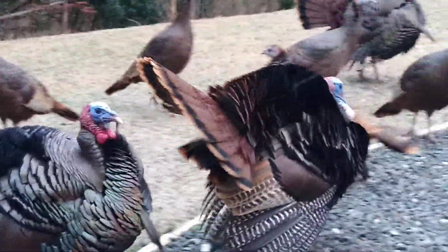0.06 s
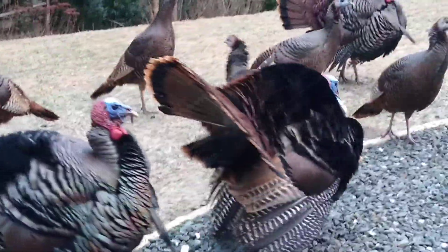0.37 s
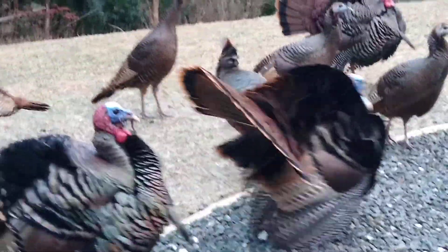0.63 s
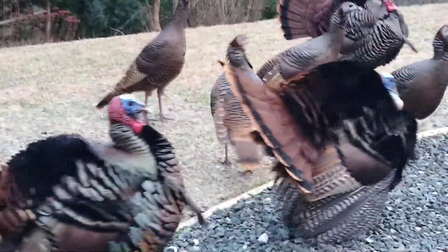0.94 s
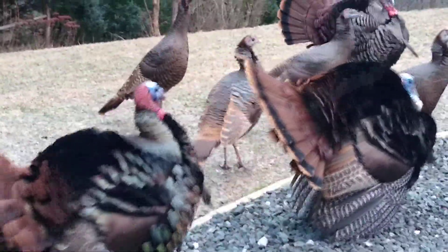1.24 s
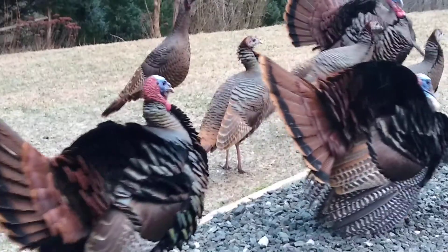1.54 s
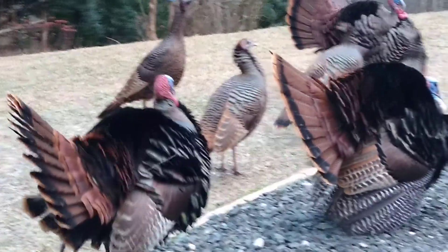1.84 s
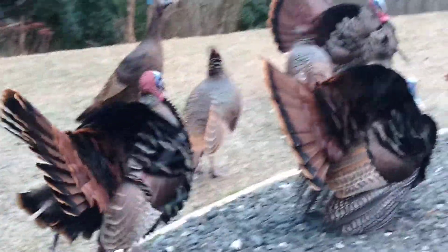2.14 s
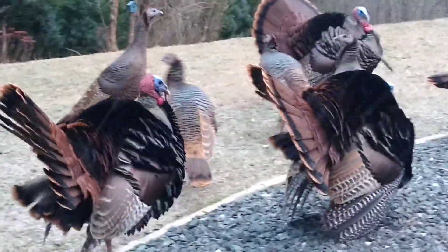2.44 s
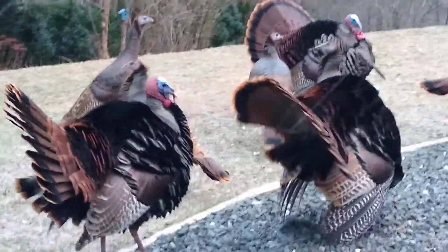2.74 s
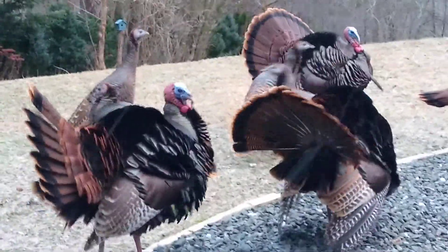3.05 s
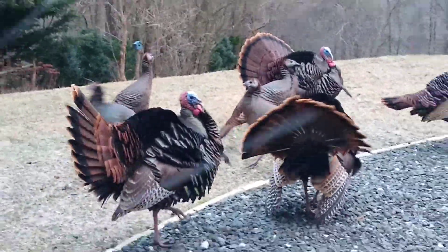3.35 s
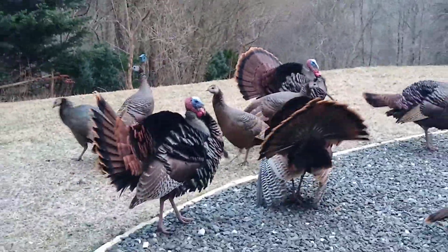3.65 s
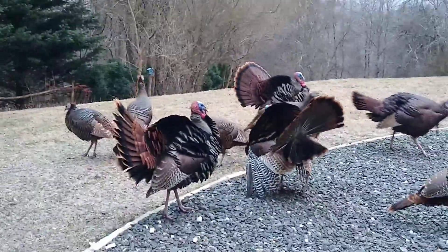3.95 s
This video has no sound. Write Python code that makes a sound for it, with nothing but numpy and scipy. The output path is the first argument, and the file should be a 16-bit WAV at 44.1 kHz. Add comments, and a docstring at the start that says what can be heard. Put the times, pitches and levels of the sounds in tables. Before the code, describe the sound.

Turkey wing feathers drag over gravel close by, rasping and ticking for the first 1.7 seconds. A short, distant gobble follows near 1.9 seconds. Brief, soft puffs sound far right at the start and at 2.1 seconds. From 2.5 seconds pebbles crunch lightly underfoot amid faint rustling, with one thin songbird whistle near 2.8. Low wind rumble builds into hard buffets on the microphone from 3.5 to 4 seconds.

```python
"""Stiff wing feathers drag, scrape and tick over stones as wild turkeys strut on a gravel drive. Pebbles crunch
under their feet and plumage rustles; two brief, breathy puffs sound close on the right. Farther off, another
bird gives a short gobble and a songbird one thin whistle, in a faint yard echo. Wind nudges the two microphone
ports and buffets them hard at the end."""
import sys
import numpy as np
from scipy import signal
from scipy.fft import rfft, irfft, next_fast_len
from scipy.io import wavfile
from scipy.ndimage import uniform_filter1d, map_coordinates

SR = 44100
rng = np.random.default_rng(int(sys.argv[2]) if len(sys.argv) > 2 else 0)


def generate_wav(signal):
    """Clip the signal to [-1, 1] and save it as 16-bit WAV at the path in sys.argv[1]."""
    frames = np.transpose(np.atleast_2d(signal))
    scaled = np.clip(frames, -1, 1) * 32767
    pcm = np.round(scaled).astype(np.int16)
    wavfile.write(sys.argv[1], SR, pcm)


N = 176400
CONTACT_LEAD_S = 0.0092  # faint grit ahead of each crack


def amp(db):
    """Decibels to gain."""
    return 10 ** (np.asarray(db) / 20)


def unit(x):
    """Scale to rms 1."""
    return x / np.sqrt(np.mean(x ** 2) + 1e-20)


def along(points, hz):
    """Read (Hz, value) points on a log frequency axis."""
    freqs, values = np.transpose(points)
    return np.interp(np.log(hz + 1), np.log(freqs + 1), values)


def curves(rows):
    """One automation curve for each column after the time."""
    times, *columns = np.transpose(rows)
    return [np.interp(np.arange(N) / SR, times, column) for column in columns]


def wobble(rate):
    """A smooth random curve, rate knots a second."""
    return map_coordinates(rng.standard_normal(int(N * rate / SR) + 4), [np.arange(N) * rate / SR])


def colour(x, db_of_hz):
    """Minimum-phase EQ: nothing rings ahead of an attack."""
    n = x.shape[-1]
    m = 2 * next_fast_len(n // 2 + 4096)
    gain = amp(db_of_hz(np.fft.rfftfreq(m, 1 / SR)))
    cepstrum = irfft(np.log(np.maximum(gain, 1e-6)))
    cepstrum[1:m // 2] *= 2
    cepstrum[m // 2 + 1:] = 0
    return irfft(rfft(x, m) * np.exp(rfft(cepstrum)), m)[..., :n]


def noise(spectrum):
    """Wide stereo coloured noise, rms 1."""
    return unit(colour(rng.standard_normal((2, N)), lambda hz: along(spectrum, hz)))


def pan(db):
    """Constant-power gains, left louder than right by db."""
    side_db = np.atleast_1d(db)
    return unit(amp(np.array([side_db, -side_db]) / 2) / np.sqrt(amp(db) + amp(-db)))


def add(out, start_s, sound):
    """Mix a short sound in at start_s."""
    part = out[:, max(0, round(start_s * SR)):][:, :sound.shape[-1]]
    part += sound[..., :part.shape[1]]


def rustle(spectrum, clump_db, patchy_db, grains_per_s=700, spread_db=5.5, decay_s=0.00041, hiss_db=-1):
    """Clumps of tiny crackles over hiss, rms 1; the resonances shift as other feathers touch."""
    sizes = amp(spread_db * np.minimum(rng.exponential(size=N), 3))
    hits = sizes * (rng.random(N) < grains_per_s / SR)
    crackle = signal.lfilter([1], [1, -np.exp(-1 / (decay_s * SR))], hits)
    grains = unit(crackle * rng.standard_normal((2, N))) + amp(hiss_db) * rng.standard_normal((2, N))
    bands = signal.stft(grains * amp(clump_db * wobble(rate=120)), nperseg=256)[2]
    patches = uniform_filter1d(rng.standard_normal(bands.shape[1:]), size=2, axis=0)
    patches = uniform_filter1d(patches, size=14, axis=1)
    patchy = signal.istft(bands * amp(patchy_db * unit(patches)), nperseg=256)[1][:, :N]
    return unit(colour(patchy, lambda hz: along(spectrum, hz)))


def contact(spectrum, tilt, t60, scrape_db, scrape_t60, lead_db=-21, rise_s=0.000097, centre_share=0.55):
    """A faint lead-in, a crack and a gritty scrape; each hit has resonances of its own."""
    t = np.arange(SR // 5) / SR - CONTACT_LEAD_S
    grit_db = np.where(t < 0, lead_db + 20 * t / CONTACT_LEAD_S, scrape_db - 60 * t / scrape_t60)
    grit = amp(grit_db) * unit(rng.standard_normal(len(t)) * rng.standard_normal((2, len(t))))
    snap = np.clip(1 + t / rise_s, 0, 1) * amp(-60 * np.maximum(t, 0) / t60)
    centre = np.sqrt(centre_share) * rng.standard_normal(len(t))
    wide = np.sqrt(1 - centre_share) * rng.standard_normal((2, len(t)))
    grid_hz = np.linspace(0, SR / 2, 48)
    bumps_db = 4 * rng.standard_normal(len(grid_hz))

    def eq(hz):
        tilt_db = tilt * np.log2(np.maximum(hz, 1000) / 4000)
        return along(spectrum, hz) + np.interp(hz, grid_hz, bumps_db) + tilt_db

    eq_rms = np.sqrt(np.mean(amp(eq(grid_hz)) ** 2))
    return colour(snap * (centre + wide) + grit, eq) / eq_rms / 2


def wing_drag():
    """Feather tips trail over the stones; in each stroke they press harder and the whole wing sounds."""
    # wing tips trailing on gravel (time [s], relative level [dB])
    trailing = [(0, -44.5), (.15, -45.5), (.24, -51.5), (.35, -45.5), (.53, -44), (.61, -48.5),
                (.76, -45.5), (.93, -46), (1.08, -52), (1.22, -51), (1.36, -56.5), (1.41, -71), (1.5, -61),
                (1.7, -102), (1.87, -74), (2.3, -100)]
    # strokes pressed into the gravel (start [s], length [s], level [dB], body against tips [dB])
    strokes = [(0.302, 0.024, -35.5, -22), (0.365, 0.17, -34.5, -15.5), (0.433, 0.091, -45, 3.5),
               (0.578, 0.057, -46.5, 4), (0.619, 0.13, -41, -6), (0.796, 0.14, -46, -4),
               (0.984, 0.029, -43, -2.5), (1.141, 0.058, -43, -6), (1.261, 0.071, -44, -7),
               (1.434, 0.014, -48.5, -31), (1.488, 0.045, -50, -28)]
    # bright rasp of the tips (frequency [Hz], gain [dB])
    tip_eq = [(150, -8.5), (400, -17), (800, -20), (1100, -17), (1500, -11.5), (2300, -12), (3400, -6.5),
              (5000, -9.5), (7000, -8.5), (10400, -3.5), (13000, -8), (15500, -11)]
    # hollow body of the wing (frequency [Hz], gain [dB])
    body_eq = [(60, -19), (130, -3), (190, 5.5), (300, -5), (450, -8), (600, -9.5), (820, -4),
               (1100, -15.5), (1600, -15.5), (3000, -39.5), (8000, -46)]
    attack_end, hold_end, release_end = 0.2, 0.74, 1.15  # in stroke lengths
    t = np.arange(N) / SR
    trail = amp(curves(trailing)[0] - 0.5)
    tip_power, body_power = trail ** 2, (amp(-9.5) * trail) ** 2
    for start, length, db, body_db in strokes:
        progress = (t - start) / length
        press = np.interp(progress, [0, attack_end, hold_end, release_end], [0.021, 1.16, 0.71, 0.0027])
        tip_power += (amp(db) * press) ** 2
        body_power += (amp(db + body_db) * press) ** 2
    tips = np.sqrt(tip_power) * rustle(tip_eq, clump_db=1.5, patchy_db=3)
    body = np.sqrt(body_power) * rustle(body_eq, clump_db=1.5, patchy_db=2)
    return tips * pan(db=6.5) + body * pan(db=1)


def quill_ticks():
    """Single quills catch on stones and spring free."""
    # quill snaps (time [s], level [dB], brightness [dB/octave])
    snaps = [(0.1048, -27, -7), (0.167, -37, -1), (0.2072, -23.5, -4), (0.279, -26, -4), (0.307, -20.5, 6),
             (0.339, -28, -2), (0.4015, -35, 5), (0.432, -24.5, -12), (0.482, -27, 6), (0.4999, -19.5, -8),
             (0.5777, -22, -2), (0.6357, -26, -3), (0.786, -40, -2), (0.798, -23, 21), (0.8134, -21.5, 4),
             (0.838, -24.5, -5), (0.8928, -18, 1), (0.958, -23, -1), (0.9938, -22, 0), (1.075, -32, 0),
             (1.171, -27, 3), (1.259, -26.5, -9), (1.451, -26.5, -7), (1.507, -32, -4),
             (1.5813, -28.5, -7.5), (1.68, -24, -4.5), (1.706, -26.5, -3.5), (2.2739, -34.5, -3.5),
             (3.3647, -48, 9), (3.4185, -30, 6), (3.4345, -27, 18), (3.7792, -27, 14), (3.953, -43, -9),
             (3.9703, -30, -4), (3.982, -27.5, 14)]
    # crisp tone of a snap (frequency [Hz], gain [dB])
    snap_eq = [(300, -42), (1800, -41.5), (3200, -11.5), (6000, -3.5), (10500, 5), (13000, 5.5),
               (15500, -8.5)]
    out = np.zeros((2, N))
    for time, db, tilt in snaps:
        tick = contact(snap_eq, tilt, t60=0.0084, scrape_db=-17.5, scrape_t60=0.11)
        add(out, time - CONTACT_LEAD_S, amp(db) * pan(db=8) * tick)
    return out


def footsteps(ring_db=7, ring_width_hz=220):
    """Pebbles knock together and slide under a foot; each rings briefly at its own pitch."""
    # shifting pebbles (time [s], level [dB], scrape against knock [dB], brightness [dB/octave], ring [Hz])
    knocks = [(2.512, -34.5, -16, -2, 5360), (2.554, -30.5, -9, 5.5, 2950), (2.584, -32.5, -9, 2, 1940),
              (2.594, -37.5, -6.5, 0.5, 1280), (2.62, -46, -25, 5, 3380), (2.715, -49.5, -11, -1, 4300),
              (3.006, -38.5, -12, -2.5, 4200), (3.275, -54, 7, 9, 7000), (3.504, -27, -17, -5, 1830),
              (3.668, -35.5, -16.5, -14, 1800), (3.829, -43.5, -4.5, -2, 6500)]
    # stony clack (frequency [Hz], gain [dB])
    pebble_eq = [(300, -41), (1700, -21.5), (2250, -5.5), (2600, -5), (3300, 5), (3800, 0.5), (4400, 1.5),
                 (5300, -6), (7000, -5), (9000, -9), (13000, -10), (14500, -29)]
    out = np.zeros((2, N))
    for time, db, scrape_db, tilt, ring_hz in knocks:
        knock = contact(pebble_eq, tilt, t60=0.011, scrape_db=scrape_db, scrape_t60=0.16)
        ringing = colour(knock, lambda hz: ring_db / (1 + ((hz - ring_hz) / ring_width_hz) ** 2))
        add(out, time - CONTACT_LEAD_S, amp(db) * pan(db=8.5) * ringing / np.sqrt(2))
    return out


def plumage():
    """Feathers slide over each other in a thin rustle, and one quill rubs with a narrow scratch."""
    # the birds shuffling (time [s], level [dB])
    shuffle = [(1.6, -55.5), (1.72, -66), (1.77, -61), (1.93, -74), (1.97, -57), (2.1, -66), (2.3, -64.5),
               (2.45, -80), (2.75, -81.5), (2.92, -71), (3.03, -80.5), (3.25, -77.5), (3.29, -62.5),
               (3.45, -59), (3.62, -69), (3.74, -73), (3.8, -56.5), (3.92, -58), (3.96, -49), (4, -54)]
    # papery feather tone (frequency [Hz], gain [dB])
    papery_eq = [(400, -32), (2000, -9.5), (3500, 0.5), (5000, -6), (6300, 1.5), (8000, 0), (11000, 6.5),
                 (13500, -3), (15500, -12.5)]
    # the quill rubbing (time [s], level [dB])
    rub = [(3.84, -100), (3.89, -53), (3.92, -70), (3.96, -48.5), (4, -75)]
    # its narrow treble band (frequency [Hz], gain [dB])
    rub_eq = [(4500, -15), (6100, -1), (8000, -44)]
    papery = amp(curves(shuffle)[0]) * rustle(papery_eq, clump_db=3, patchy_db=7.5)
    scratch = amp(curves(rub)[0]) * noise(rub_eq)
    return (papery + scratch) * pan(db=9.5)


def puffs():
    """Two brief, breathy puffs, close on the right, that swell and stop short."""
    # puffs (start [s], length [s], level [dB], left over right [dB])
    bursts = [(0.004, 0.036, -35.5, -16), (2.117, 0.048, -34.5, -33)]
    # broad, breathy tone (frequency [Hz], gain [dB])
    puff_eq = [(150, -22), (250, -5.5), (392, -3), (1400, -0.5), (1760, -4), (2280, -8.5), (4390, -10),
               (5410, -11.5), (8920, -4.5), (15500, -10.5)]
    out, t = np.zeros((2, N)), np.arange(N) / SR
    for start, length, db, side_db in bursts:
        swell = np.interp((t - start) / length, [0, .35, .7, 1, 1.05], [0.0023, 0.78, 1.29, 0.85, 0.00099])
        out += amp(db) * swell * pan(side_db) * noise(puff_eq)
    return out


def gobble(rise_oct=0.1, arch_oct=0.035, release_ratio=0.5):
    """Rough notes flip between three registers; each swells as its pitch arches up, then breaks off."""
    # notes (crest [s], swell [s], pitch at crest [Hz], level before EQ [dB], step per harmonic [dB])
    notes = [(1.806, 0.0083, 785, -46, -14.5), (1.839, 0.0095, 800, -53.5, -19),
             (1.851, 0.005, 2080, -66, -37), (1.874, 0.0072, 805, -45.5, -15),
             (1.883, 0.0044, 2080, -55, -14), (1.893, 0.0034, 1370, -45, -14),
             (1.915, 0.0061, 843, -40, -20), (1.923, 0.0022, 2120, -53, -35),
             (1.93, 0.0024, 1440, -41, -18), (1.959, 0.0048, 733, -33, -9), (1.982, 0.0055, 745, -43, -27)]
    # dull tone of the distant call (frequency [Hz], gain [dB])
    voice_eq = [(300, -32), (600, -2), (2200, 0), (2500, -20), (3500, -22), (6000, -45)]
    out, t = np.zeros(N), np.arange(N) / SR
    jitter, flutter = 1 + 0.032 * wobble(rate=540), 1 + 0.28 * wobble(rate=500)
    for crest, swell, pitch_hz, db, step_db in notes:
        age = np.clip((t - crest) / swell, -8, 8)
        bend = rise_oct * np.clip(age, -.5, 2) - arch_oct * np.clip(age, 0, 2) ** 2
        phase = 2 * np.pi * np.cumsum(pitch_hz * 2 ** bend * jitter) / SR
        envelope = np.exp(-np.where(age < 0, age, age / release_ratio) ** 2 / 2)
        out += amp(db) * envelope * sum(amp(k * step_db) * np.sin((k + 1) * phase) for k in range(3))
    return colour(out * flutter, lambda hz: along(voice_eq, hz)) * pan(db=6)


def songbird():
    """One thin, slightly unsteady whistle from the trees."""
    # whistle contour (time [s], pitch [Hz], level [dB])
    whistle = [(2.76, 7800, -104), (2.785, 7520, -70.5), (2.815, 7280, -65), (2.87, 7400, -63),
               (2.93, 7500, -68.5), (3.02, 7330, -116)]
    hz, db = curves(whistle)
    t = np.arange(N) / SR
    sounding = (t > whistle[0][0]) & (t < whistle[-1][0])
    envelope = sounding * amp(db + 3.1 * wobble(rate=60))
    phase = 2 * np.pi * np.cumsum(hz * (1 + 0.018 * wobble(rate=320))) / SR
    return envelope * np.sin(phase) * pan(db=14)


def wind(roar_onset_db=-20.5, tearing_db=-16.5):
    """Air rumbles on each microphone port; buffets raise the flow into a brighter, lumpy roar."""
    # light wind (time [s], relative level [dB], left over right [dB])
    breeze = [(0.0, -52.5, -11), (0.14, -60, -1), (0.18, -52, -8), (0.26, -66, -30), (0.41, -50, 5.5),
              (0.64, -60.5, 0), (1.89, -61.5, 3), (1.96, -49.5, -21), (2.08, -48.5, 5.5), (2.26, -68, 5),
              (2.3, -51.5, -16), (2.34, -61.5, -12), (2.47, -48.5, -42), (2.5, -55.5, -28), (2.62, -65, 1),
              (2.91, -61, -15), (3.09, -58, -4.5), (3.15, -66, -3), (3.32, -48.5, -19), (3.4, -41.5, -3),
              (3.5, -37, 0), (3.75, -34, -6.5), (4, -32, -13)]
    # hard buffets (middle [s], length [s], level [dB], left over right [dB])
    buffets = [(3.543, 0.015, -27.5, 4), (3.573, 0.08, -33.5, -18), (3.666, 0.058, -31, 19),
               (3.691, 0.043, -30.5, -8), (3.731, 0.042, -26.5, 18), (3.775, 0.042, -17.5, -21),
               (3.811, 0.047, -25.5, 13), (3.813, 0.033, -21.5, -16), (3.878, 0.044, -23.5, -25),
               (3.925, 0.06, -27, 17), (3.983, 0.033, -21.5, -10.5)]
    # low rumble of gentle flow (frequency [Hz], gain [dB])
    rumble_eq = [(20, -18.5), (45, -7), (85, 0.5), (160, -6.5), (240, -20.5), (400, -37), (800, -52),
                 (2000, -74)]
    # roar of strong flow (frequency [Hz], gain [dB])
    roar_eq = [(40, -29.5), (130, -6), (240, 9), (320, 0.5), (440, -6.5), (620, -18), (780, -38.5),
               (1100, -43.5), (2500, -53.5)]
    # tearing edge of the hardest buffets (frequency [Hz], gain [dB])
    tearing_eq = [(250, -20.5), (600, 5), (900, -12.5), (1500, -24), (2200, -31), (4000, -55)]
    t = np.arange(N) / SR
    breeze_db, side_db = curves(breeze)
    power = (amp(breeze_db + 3) * pan(side_db)) ** 2
    for middle, length, db, port_db in buffets:
        power += (amp(db) * pan(port_db) / (1 + (2 * (t - middle) / length) ** 4)) ** 2
    flow = np.sqrt(power)
    lumps = amp(3.4 * np.array([wobble(rate=90), wobble(rate=90)]))
    drive = flow / amp(roar_onset_db)
    squash = np.sqrt(1 + drive ** 2)
    tearing = amp(tearing_db) * drive ** 2 * unit(lumps * noise(tearing_eq))
    rumble = noise(rumble_eq) / squash
    roar = drive * unit(lumps * noise(roar_eq))
    return flow * (rumble + roar + tearing) / squash


def eddies(low_cut_hz=90):
    """Single eddies strike the right port: brief pressure pushes that rebound."""
    # pushes (time [s], level before the low cut [dB], width [s])
    pushes = [(1.952, -31, 0.0013), (1.967, -29.5, 0.00093), (2.307, -22, 0.0021), (2.465, -22, 0.0016),
              (2.895, -34.5, 0.0015), (3.092, -30, 0.0016), (3.783, -4, 0.0015), (3.806, -4, 0.00041),
              (3.895, -4.5, 0.00056), (3.985, -8.5, 0.00049)]
    t = np.arange(N) / SR
    pressure = sum(amp(db) * np.exp(-((t - time) / width) ** 2 / 2) for time, db, width in pushes)
    port = signal.butter(2, low_cut_hz, 'highpass', fs=SR, output='sos')
    return signal.sosfilt(port, pressure) * pan(db=-29.5)


def yard_echo(send):
    """A short, diffuse echo from the house and the trees."""
    # decay of the yard (frequency [Hz], time to fall 60 dB [s])
    decay = [(200, 0.42), (1500, 0.22), (5000, 0.38), (14000, 0.41)]
    hz, t, bands = signal.stft(rng.standard_normal((2, SR // 2)), SR, nperseg=256)
    tail = signal.istft(bands * amp(-60 * t / along(decay, hz)[:, None]), SR, nperseg=256)[1]
    mono = send.sum(0)[None] / np.sqrt(2)
    return signal.fftconvolve(mono, tail / np.linalg.norm(tail[0]), axes=1)[:, :N]


def air(level_db=-97):
    """A barely audible bed of outdoor air."""
    # low murmur with a trace of hiss (frequency [Hz], gain [dB])
    air_eq = [(100, 20.5), (400, -18), (1000, -11), (4000, -53), (12000, -28), (16000, -29)]
    return amp(level_db) * noise(air_eq)


def scene(near_send_db=-15, far_send_db=-9):
    """Close turkeys, distant calls with more echo, and dry wind on the microphone."""
    near = wing_drag() + plumage() + quill_ticks() + footsteps() + puffs()
    far = gobble() + songbird()
    echo = yard_echo(amp(near_send_db) * near + amp(far_send_db) * far)
    return near + far + echo + wind() + eddies() + air()


def record(dry, top_hz=16000):
    """A brick-wall high cut on the whole mix."""
    m = next_fast_len(N + SR // 2)
    passband = np.fft.rfftfreq(m, 1 / SR) < top_hz
    return irfft(rfft(dry, m) * passband, m)[:, :N]


dry = scene()
out = record(dry)
generate_wav(out)
```